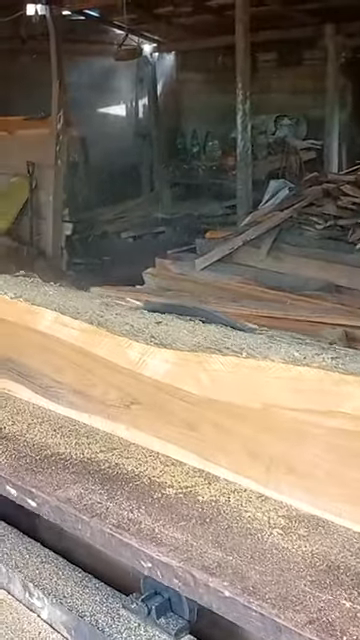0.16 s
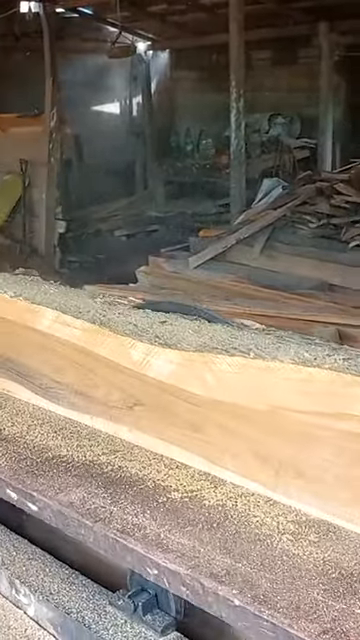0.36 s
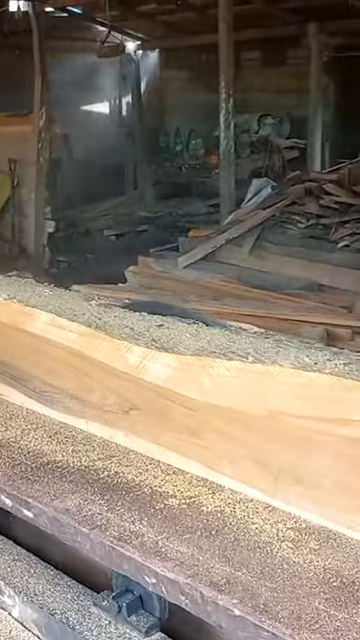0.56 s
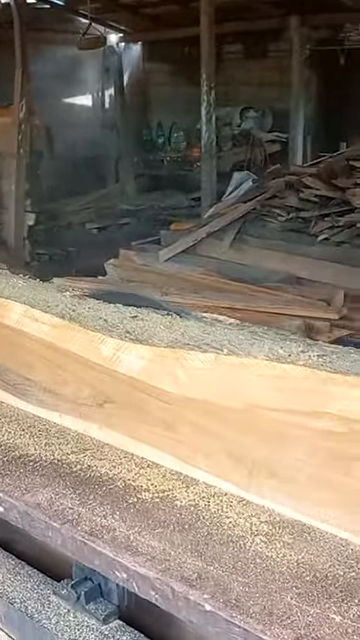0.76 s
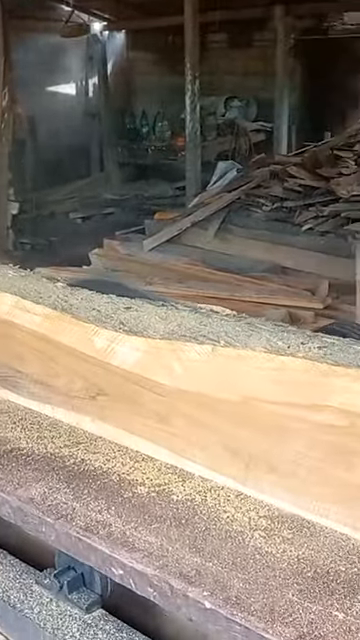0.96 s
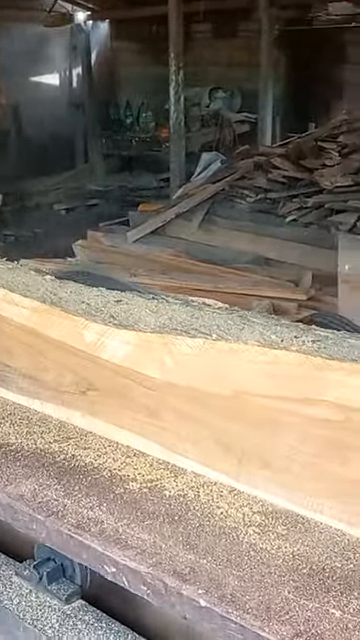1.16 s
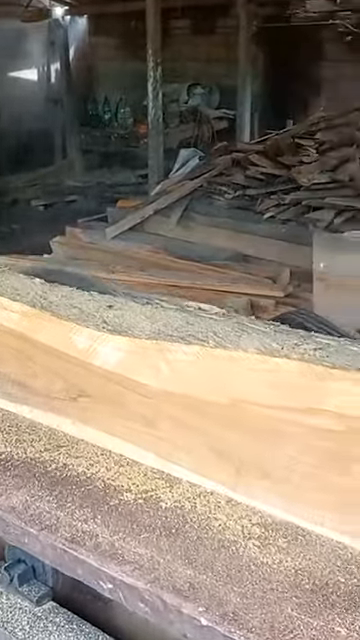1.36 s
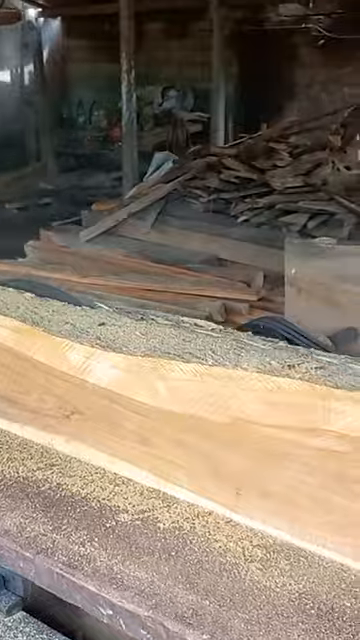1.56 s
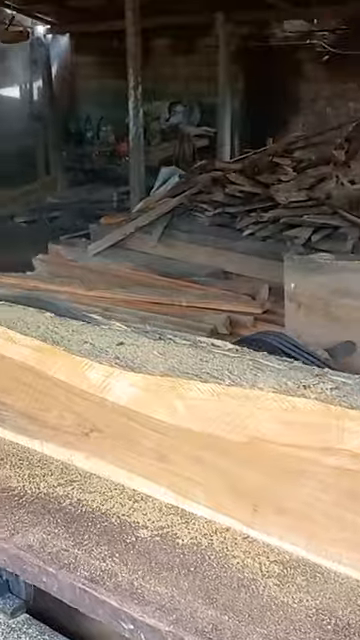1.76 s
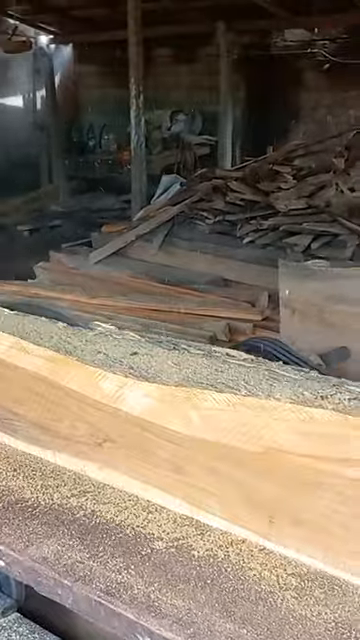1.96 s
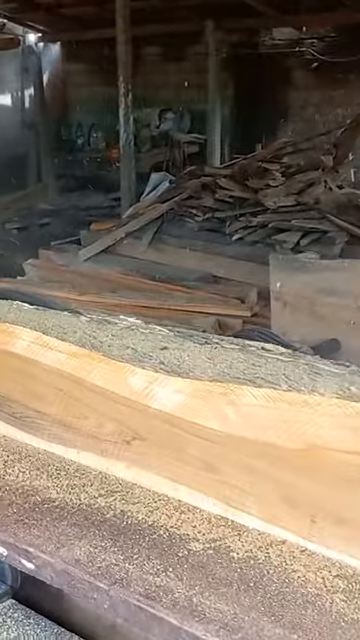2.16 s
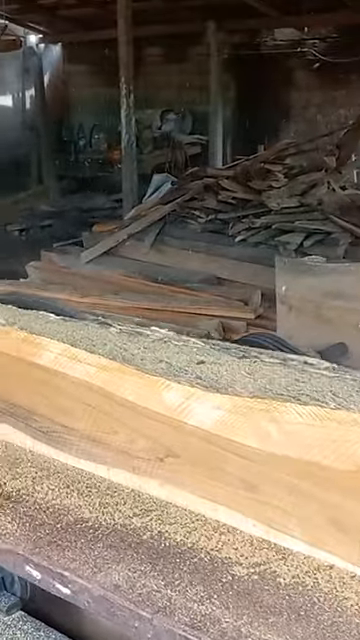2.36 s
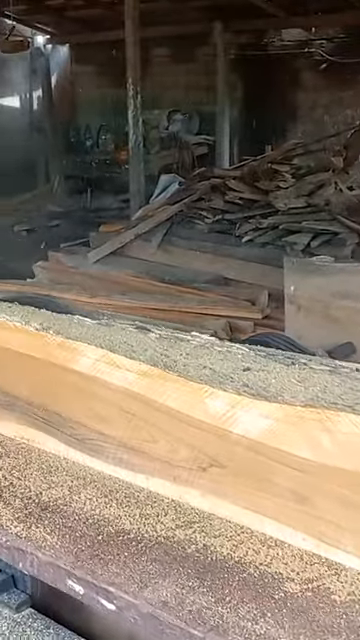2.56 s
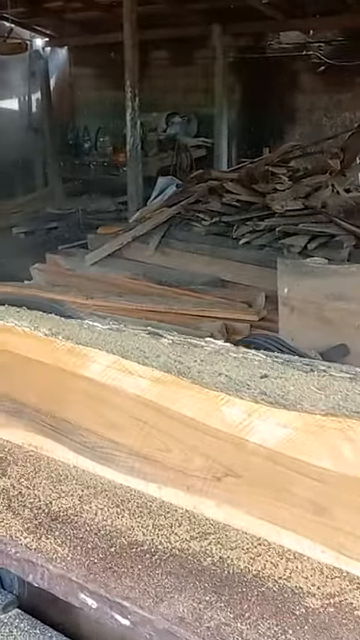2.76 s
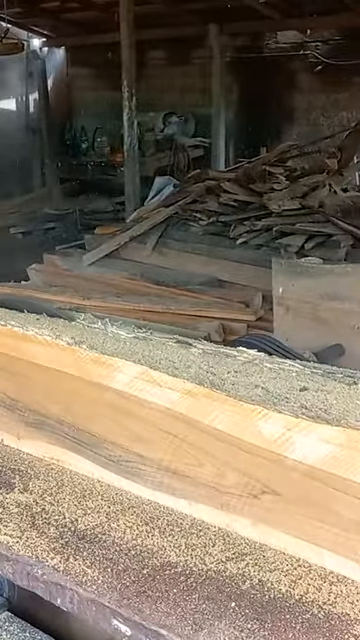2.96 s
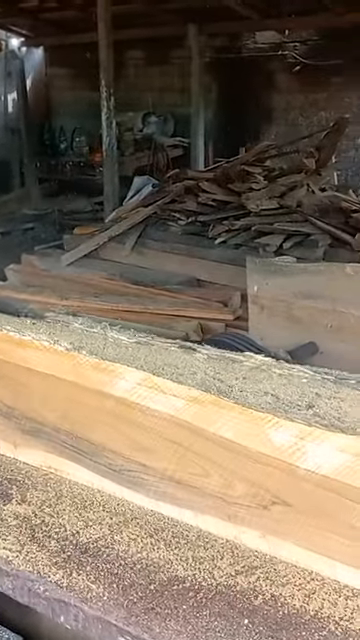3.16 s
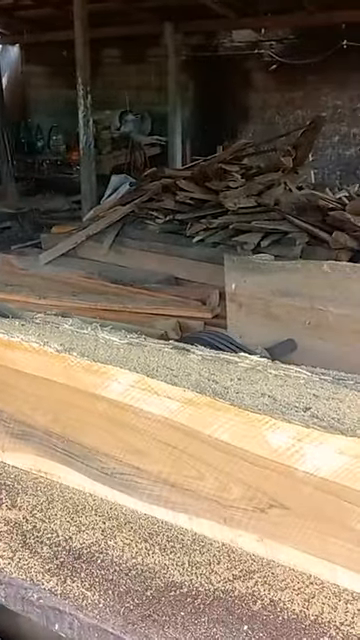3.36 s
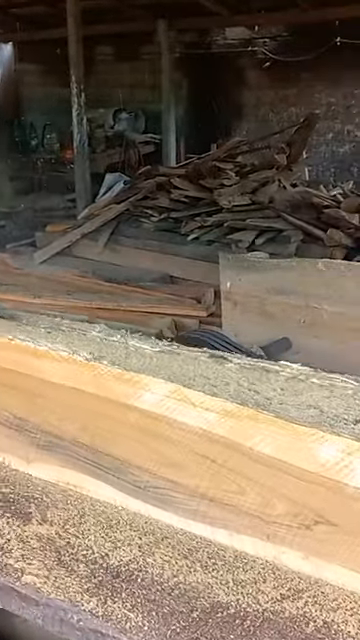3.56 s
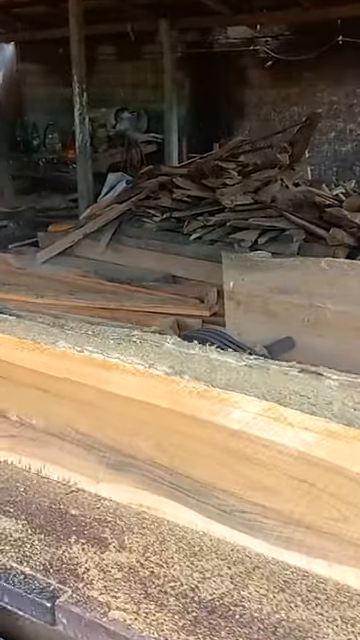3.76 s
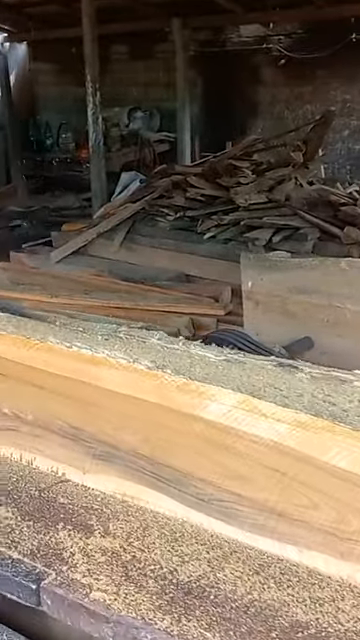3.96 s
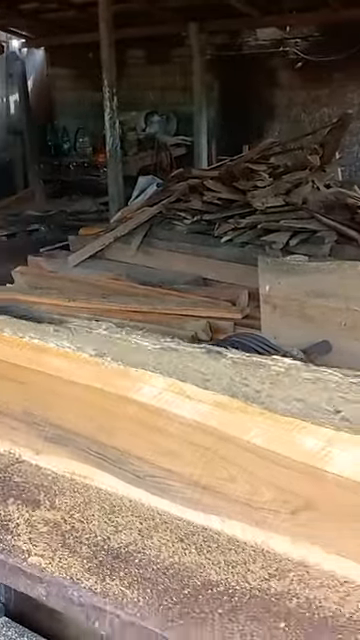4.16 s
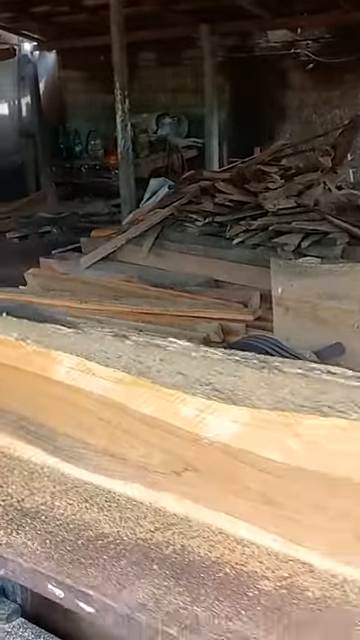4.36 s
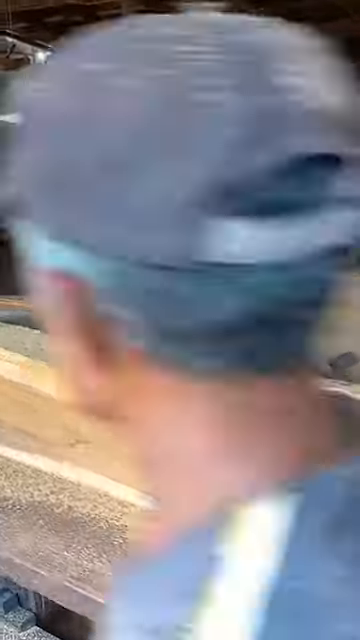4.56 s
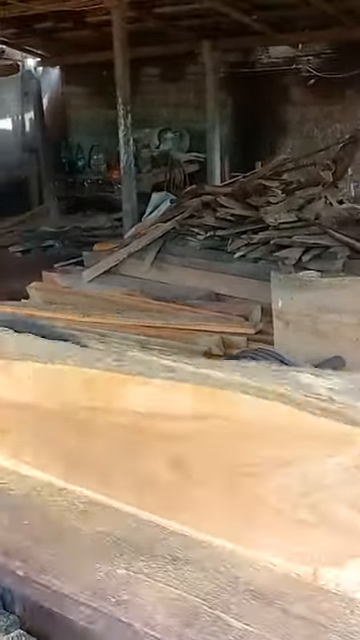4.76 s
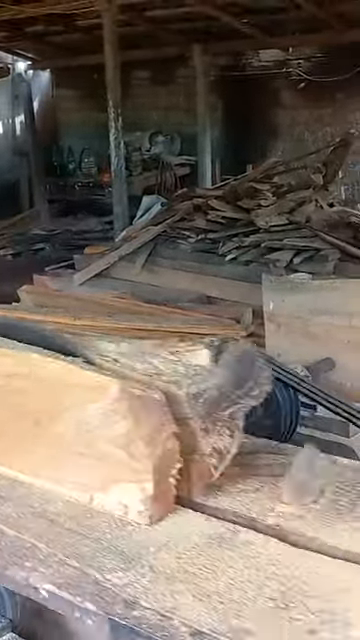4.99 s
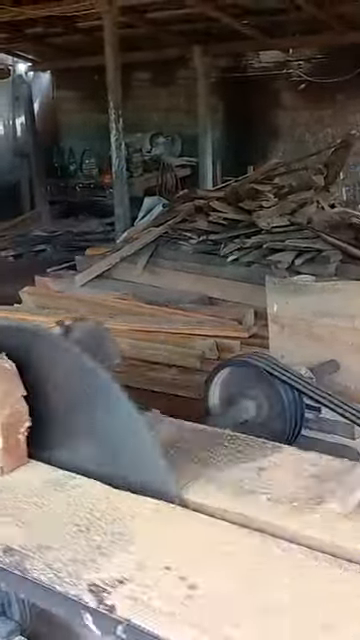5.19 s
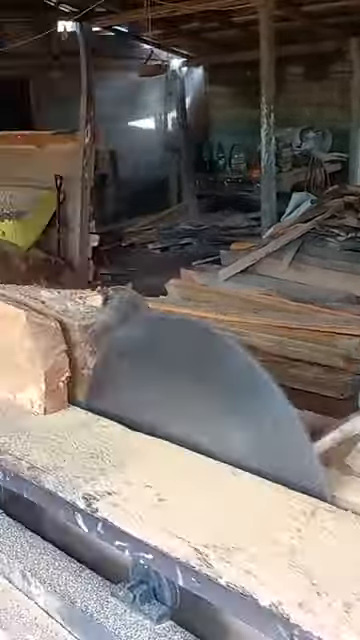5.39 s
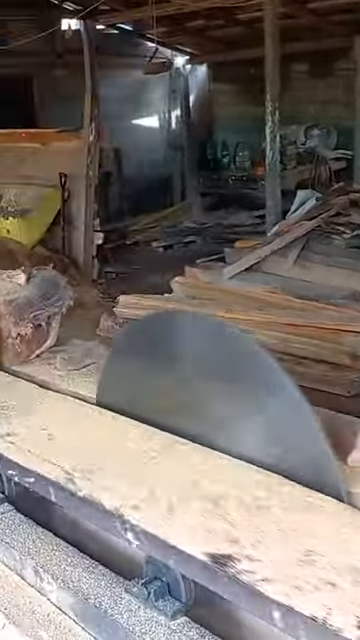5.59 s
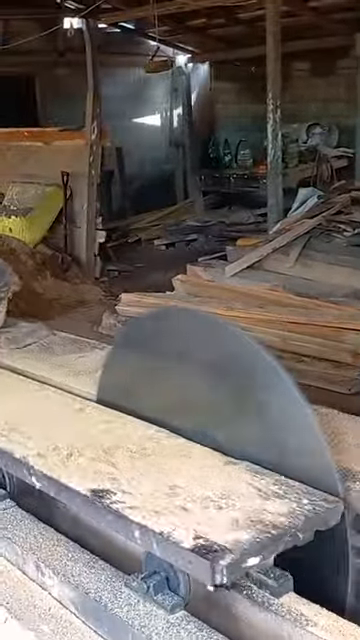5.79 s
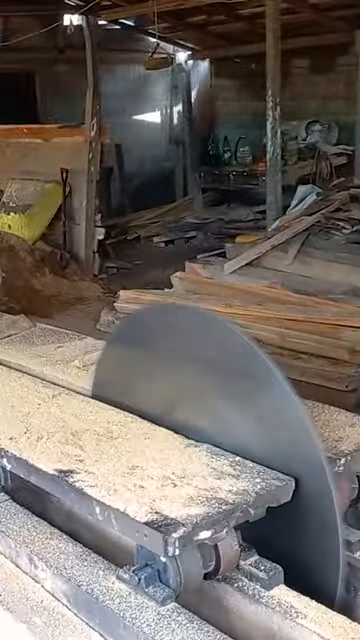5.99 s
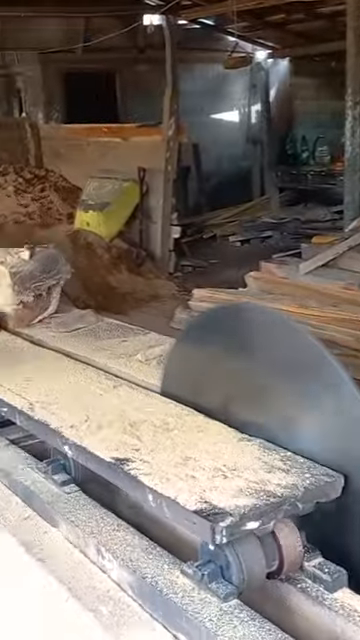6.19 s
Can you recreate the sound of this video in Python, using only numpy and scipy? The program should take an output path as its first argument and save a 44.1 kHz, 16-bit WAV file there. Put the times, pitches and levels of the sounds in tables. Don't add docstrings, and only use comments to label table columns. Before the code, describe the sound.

From the start, a large circular saw is already deep in a thick plank, loud and close in an open shed. A strident whine around 1.5 kHz, with higher overtones, is wrapped in coarse, fluttering rasp and hissing chips. About five times a second the feed hangs, easing the bite and nudging the pitch up. Dry carriage knocks tick by around 0.7-1.5 seconds. Near 3.9 seconds the tone becomes looser, more metallic and ringing, the pitch slightly higher. At about 4.9 the cut ends abruptly; the blade runs on with a thin steady whine over rumbling wheels, belt and airy hiss. Between 4.9 and 5.7 come very high, short bearing squeaks and scattered clicks. At 5.9 the carriage slams its stop in a hard, clattering double clank; the background dips, then recovers around 6.2 with a tiny squeak. The sound is thin in bass and slightly saturated.

```python
import sys
import numpy as np
from scipy import signal
from scipy.fft import rfft, irfft, next_fast_len
from scipy.io import wavfile
from scipy.ndimage import uniform_filter1d, map_coordinates

SR = 44100
rng = np.random.default_rng(int(sys.argv[2]) if len(sys.argv) > 2 else 0)


def volts_from_decibels(level):
    exponent = np.asarray(level, float) / 20
    return 10 ** exponent


def store_pcm(level_fs):
    pcm = np.round(np.clip(level_fs, -1, 1) * 32767).astype(np.int16)
    wavfile.write(sys.argv[1], SR, np.atleast_2d(pcm).T)


N = 274743
FAST = next_fast_len(N)
TIME, HZ = np.arange(N) / SR, np.fft.rfftfreq(FAST, 1 / SR) + 1
TOOTH_COUNT, FREE_TOOTH_HZ, FREE_FROM_S = 30, 1621, 4.885

# time in seconds, rate in Hz.
LOADED_RATE = [(0, 1562), (.17, 1554), (.36, 1560), (1.13, 1562), (1.27, 1536), (1.6, 1551), (1.92, 1544),
               (2.1, 1561), (2.35, 1560), (2.49, 1550), (2.66, 1533), (3.1, 1529), (3.3, 1560),
               (3.49, 1548), (3.54, 1562), (3.63, 1563), (3.73, 1601), (3.82, 1610), (4.0, 1588),
               (4.1, 1599), (4.88, 1601)]
# centre in seconds, half length in seconds,
# share of the lost speed regained from 0 to 1, easing of the bite in dB.
SLACKS = [(0.073, 0.085, 0.99, 1.5), (0.26, 0.079, 0.9, 1.5), (0.457, 0.075, 0.97, 3.5),
          (0.657, 0.12, 0.87, 4.5), (0.879, 0.085, 0.76, 2.5), (1.063, 0.07, 0.76, 1.5),
          (1.189, 0.062, 0.98, 1.5), (1.392, 0.17, 0.98, 4), (1.635, 0.088, 0.98, 3.5),
          (1.818, 0.075, 1, 1), (2.003, 0.081, 1, 1.5), (2.181, 0.095, 0.09, -1), (2.386, 0.095, 1, 2.5),
          (2.571, 0.075, 0.93, 2), (2.768, 0.13, 0.96, 3.5), (2.997, 0.081, 0.93, 1.5),
          (3.19, 0.086, 0.99, 0.5), (3.405, 0.12, 0.61, -2), (3.851, 0.053, 0.04, 2.5),
          (3.924, 0.04, 0.01, 4.5), (4.106, 0.061, 0.04, 1), (4.413, 0.1, 0.04, -0.5),
          (4.582, 0.054, 0.01, -1)]
# time in seconds, extent from 0 to 1.
SKIMMING = [(0, .5), (1.0, .5), (1.4, 1), (2.42, 1), (2.5, .15), (3.1, .2), (3.2, .6), (4.9, .6)]
# time in seconds, bite in dB, freedom of the wood to ring in dB.
CUT = [(0, -21.5, 2), (.35, -20.5, 1), (.5, -21.5, 3), (1.0, -21, 2.5), (1.75, -20, 2.5), (2.3, -22.5, 2),
       (2.65, -19.5, -1), (2.92, -20.5, 1), (3.4, -25, 4.5), (3.56, -21, -0.5), (3.75, -25.5, 6),
       (3.935, -22.5, 0), (3.965, -24, 5), (4.12, -17, 1), (4.5, -18, -4.5), (4.7, -19.5, 1.5),
       (4.86, -21, -3.5), (4.905, -43, 13)]
# time in seconds, share of the loose state from 0 to 1.
LOOSENESS = [(3.94, 0.01), (3.965, 0.75), (4.2, 1), (4.58, 0.97), (4.68, 0.8), (4.9, 1)]
# time in seconds, gain in dB.
GAIN = [(4.86, -7), (4.95, -7), (5.1, -5.5), (5.3, -3), (5.55, -3.5), (5.86, -0.5), (5.9, 1.5),
        (5.94, -8.5), (5.965, -8.5), (6.17, -8.5), (6.23, 1)]

# time in seconds, levels of the first, second and third partials in dB.
WHINE = [(.12, -36, -31.5, -25.5), (.36, -25, -28, -29), (.58, -32.5, -27, -26), (0.971, -30, -25, -28.5),
         (1.27, -31.5, -32.5, -26), (1.7, -35, -31, -22), (1.95, -53, -36, -32.5), (2.1, -46, -43, -30),
         (2.22, -41, -50, -24), (2.45, -44, -40, -24.5), (2.6, -39.5, -30.5, -38), (2.75, -43, -32.5, -31),
         (2.84, -38, -33, -32), (2.911, -32, -28.5, -33), (2.98, -41, -40, -24), (3.07, -36.5, -32, -34),
         (3.2, -37, -33, -48), (3.44, -49, -43, -44), (3.51, -39, -32.5, -32.5), (3.77, -34, -24.5, -34),
         (3.82, -45, -40, -40), (3.93, -39, -39, -45), (3.96, -40, -33, -31), (4.03, -32, -30, -31),
         (4.14, -37, -32, -43), (4.27, -45, -17, -26.5), (4.36, -41, -42, -40), (4.52, -34, -33, -35),
         (4.6, -32, -41, -52), (4.7, -37.5, -19.5, -51), (4.78, -38, -34, -51), (4.859, -41, -32, -41),
         (4.902, -35, -41, -38)]
# time in seconds, level in dB.
FOURTH_PARTIAL = [(0, -36), (2, -39), (2.66, -29), (2.8, -44), (3.45, -32), (3.6, -29), (3.9, -29.5),
                  (4, -64), (4.85, -50), (4.95, -63), (6.23, -52)]
FREE_WHINE_DB = (-27.5, -38, -40.5)
WHINE_EASE = (.6, 1.3, 1.0)
WHINE_GAP_DB = (4, 12, 12)
# waves in a turn, level against the bite in dB.
RIM_PATTERNS = [(150, -15), (158, -17), (180, -16), (189, -16), (210, -12), (222, -15), (228, -16),
                (240, -14), (250, -14), (270, -15), (278, -16), (299, -17)]
# waves in a turn, centre in seconds,
# half length in seconds, lift in dB.
RIM_SWELLS = [(150, 0.11, 0.24, 10.5), (150, 2.38, 0.11, 7), (150, 4.1, 0.054, 2), (150, 1.9, 0.064, 10),
              (150, 3.7, 0.17, 5), (158, 1.145, 0.14, 6), (158, 2.49, 0.088, 12.5), (180, 1.88, 0.093, 1),
              (180, 1.9, 0.13, 9), (180, 3.3, 0.057, 8), (180, 3.4, 0.17, 6), (189, 0.23, 0.18, 5),
              (189, 0.62, 0.18, 9), (210, 0.54, .1, 4), (210, 0.75, 0.15, 8), (210, 0.93, 0.067, 9),
              (210, 1.7, 0.065, 6), (210, 1.515, 0.1, 1), (210, 2.4, 0.26, 8.5), (210, 2.78, 0.4, 3.5),
              (222, 1.16, 0.32, 7), (222, 0.82, 0.065, 6), (228, 1.53, 0.1, 4), (228, 3.245, 0.18, 9),
              (240, 0.19, .12, 10.5), (240, 0.33, 0.092, 8.5), (240, 2.07, .3, 13.5), (240, 2.7, 0.097, 6),
              (240, 3.5, 0.17, 6), (250, 0.086, 0.23, 9.5), (250, 0.39, 0.15, 9), (250, 1.76, 0.11, 8),
              (270, 0.55, 0.27, 11), (270, 1.5, 0.082, 1), (270, 1.92, .13, 13), (270, 3.07, 0.071, 15),
              (278, 1.995, 0.22, 14), (299, .1, .15, 16.5), (299, .72, 0.3, 15), (299, 2.36, 0.23, 9)]

# frequency in Hz, density in dB per Hz.
KERF_COLOUR = [(120, -66), (200, -46), (310, -26), (366, -8.5), (735, -5.5), (1040, 4), (1560, -2),
               (2020, -6.5), (2250, 3.5), (3560, -3), (4770, -3), (7140, -8), (11300, -4), (16000, -4)]
# frequency in Hz, width in Hz, lift in dB.
GRIPPED_MODES = [(1060, 140, 7.5), (1870, 550, 12.5), (2238, 140, 5.5), (3150, 310, 3), (4450, 890, 0.5),
                 (8100, 430, 2.5), (9500, 390, 2), (11300, 430, 4), (12500, 900, 2), (15000, 1200, 2.5)]
# frequency in Hz, width in Hz, lift in dB.
GRIPPED_DEAD = [(3720, 540, -3), (5530, 210, -5), (7150, 280, -3)]
# frequency in Hz, width in Hz, lift in dB.
LOOSE_MODES = [(1092.4, 790, 4), (1840, 70, 16.5), (2150, 400, 11), (2740, 40, 12.6), (3240, 280, 7.5),
               (4710, 87, 12), (5014, 113, 13)]
# frequency in Hz, width in Hz, lift in dB.
LOOSE_HIGH = [(6877, 50, 15), (7950, 110, 13), (8340, 150, 10), (9570, 110, 17), (9800, 120, 8),
              (10090, 90, 15), (11100, 130, 18), (11700, 90, 9), (12700, 170, 8), (13300, 90, 4),
              (14200, 200, 8), (14850, 110, 7)]
# frequency in Hz, width in Hz, lift in dB.
LOOSE_DEAD = [(3850, 240, -3), (5370, 600, -8.5), (7400, 440, -5)]
# level at the start in dB, drift as the plank splits in dB a second,
# change once loose in dB, share of the freedom to ring.
BODIES = [
    (-16, -0.72, 9.5, 1),
    (-21.5, 2.5, -0.5, 0.47),
    (-17.5, 2.5, -3, 0.44),
]
EASE_SHARES = (1.3, .8, .2)
# centre in seconds, half length in seconds, lift in dB.
BOOMS = [
    (.3, 0.55, 9),
    (2.92, 0.082, 1.5),
    (3.504, 0.49, 3),
    (4.349, 0.48, 2),
]
# waves in a turn,
# gripped level in dB, loose level in dB, both against the plank.
SLAPS_LOW = [(7, -27.5, -32), (8, -28, -30.5), (11, -23, -33), (12, -22.5, -21.5), (17, -17, -31),
             (18, -25, -33), (16, -22, -45), (20, -16, -14.5), (19, -16, -20), (21, -19, -18),
             (22, -26, -12), (26, -27, -17)]
# waves in a turn, gripped level in dB, loose level in dB,
# both against the plate.
SLAPS_HIGH = [(29, -10, -24), (31, -35, -19.5), (33, -10, -29), (35, -14, -13), (36, -8, -26),
              (39, -27, -14), (41, -5, -12), (42, -5, -11), (43, -18, -20), (47, -39, -11.5),
              (51, -34, -12), (61, -5, -13), (58, -30, -15), (62, -28, -13), (92, -30, -19),
              (93.2, -32, -14)]
# waves in a turn, centre in seconds, half length in seconds, lift in dB.
SLAP_SWELLS = [(7, .1, .2, 6), (7, 2.15, .2, 10), (7, 4.44, .15, 10), (8, 3.15, .45, 12), (8, 3.68, .1, 10),
               (8, 2.78, .08, 10), (12, 4.25, .3, 5), (17, 3.8, .25, 6), (20, .4, .35, 11),
               (20, 2.2, .15, 9), (20, 2.93, .1, 14), (20, 3.4, .2, 15), (20, 3.64, .18, 13),
               (20, 4.56, .25, 11), (19, 4.35, .2, 6), (22, 4.6, .15, 10), (26, 4.35, .2, 6),
               (35, 4.2, .22, 13), (35, 4.85, .1, 6), (36, .1, .15, 8), (36, 1.45, .25, 8),
               (36, 1.75, .1, 6), (36, 3.39, .1, 9), (41, 3.4, .1, 10), (41, 4.33, .12, 8),
               (42, .68, .15, 10), (42, 2.19, .12, 9), (42, 4.12, .17, 11), (42, 4.58, .25, 13),
               (42, 4.8, .16, 15), (43, 4.72, .12, 6), (61, 4.7, .12, 12), (18, 2.2, .12, 8),
               (21, 2.3, .3, 6), (11, .55, .15, 8), (47, 4.85, .17, 16), (51, 4.04, .06, 10),
               (51, 4.2, .12, 5), (61, .97, .12, 10), (61, 1.6, .15, 8), (61, .55, .08, 8),
               (29, 4.14, .15, 8), (31, 4.17, .25, 16), (29, 1.25, .25, 6), (29, 4.75, .1, 6),
               (21, 2.94, .1, 8), (21, 3.4, .15, 7), (19, 3.6, .25, 8)]
# frequency in Hz, side against mid in dB.
WIDTH = [(60, -4), (110, -12), (200, -9), (380, -12), (700, -9.5), (1290, -18), (2380, -10), (4400, -3.5),
         (8120, 0), (15000, -0.5)]

# frequency in Hz, density in dB per Hz.
SHED_COLOUR = [(15, -76), (25, -43), (223, -26.5), (373, -9), (659, -13.5), (863, -7.5), (1480, -8.5),
               (1610, -13.5), (1740, -7.5), (2350, 2), (2690, -1.5), (5000, -6), (10100, -2), (11300, -2.5),
               (12500, -3.5), (16000, -5.5)]
# frequency in Hz, width in Hz, lift in dB.
SHED_MODES = [(360, 9.9, 6.5), (883, 4.4, 12.5), (2160, 41, -5), (4690, 850, 5)]
# start in seconds, crack level in dB, crack frequency in Hz,
# crack decay to -60 dB in seconds, thud level in dB.
KNOCKS = [(.712, -18, 4500, .012, -56), (.815, -17, 4500, .012, -54), (.912, -15, 4500, .012, -44),
          (1.011, -14, 6500, .012, -39), (1.112, -16, 7000, .012, -60), (1.114, -13, 1300, .016, -40),
          (1.219, -17, 1800, .014, -37), (1.2185, -14, 7000, .012, -60), (1.326, -13, 2200, .016, -36),
          (1.432, -11, 1050, .03, -35), (1.4298, -9, 3800, .028, -60), (1.534, -14, 1000, .016, -41),
          (1.5335, -13, 4200, .014, -60), (3.954, -13, 4500, .04, -50), (3.98, -15, 2400, .06, -60),
          (4.105, -17, 2600, .05, -60), (4.18, -18, 1000, .04, -50), (5.3318, -9, 3600, .025, -46),
          (5.225, -30, 500, .04, -38), (5.46, -26, 500, .06, -40), (5.52, -30, 500, .04, -40),
          (5.166, -25, 13500, .06, -70), (5.439, -27, 12000, .015, -70), (5.61, -25, 14000, .015, -70),
          (5.633, -24, 12500, .015, -70), (3.8158, -17, 2800, .03, -60), (4.9197, -18, 2500, .03, -60),
          (5.01, -21, 3700, .02, -60), (5.029, -20, 3700, .04, -60), (5.4655, -19, 2500, .02, -55)]
# start in seconds, crack level in dB, crack frequency in Hz,
# crack decay to -60 dB in seconds, thud level in dB.
STOP = [
    (5.87, -25, 1300, .06, -38),
    (5.8893, -2.5, 3700, .04, -25),
    (5.896, -9, 2200, .07, -34),
    (5.9, -14, 800, .12, -42),
    (5.904, -8, 2000, .07, -32),
    (5.9138, -4.5, 3000, .04, -23),
    (5.918, -4.5, 3600, .04, -42),
    (5.92, -15, 900, .1, -42),
    (5.928, -13, 3200, .04, -28),
    (5.945, -22, 600, .08, -34),
]
# start in seconds, length in seconds, high ring in dB, lower ring in dB.
SQUEAKS = [
    (4.921, 0.051, -33, -59),
    (4.985, 0.057, -29, -50),
    (5.166, .11, -27, -38),
    (5.326, 0.066, -31, -54),
    (5.418, 0.067, -22, -35),
    (5.548, 0.031, -27, -46),
    (5.608, 0.068, -27, -42),
    (5.691, .08, -48, -57),
    (6.218, 0.03, -36, -50),
]


def curves(table):
    seconds, *columns = np.transpose(table)
    return [np.interp(TIME, seconds, column) for column in columns]


def bump(time, centre_s, half_length_s):
    return np.cos(np.pi / 2 * np.clip((time - centre_s) / half_length_s, -1, 1)) ** 2


def walk(rate):
    hold = int(SR / rate)
    levels = np.repeat(rng.standard_normal(N // hold + 1), hold)
    return uniform_filter1d(levels, hold)[:N]


def spectrum(points):
    hz, db = np.transpose(points)
    return np.interp(np.log(HZ), np.log(hz), db)


def lifted(colour, modes):
    humps_db = sum(db / (1 + (2 * (HZ - hz) / width) ** 2) for hz, width, db in modes)
    return volts_from_decibels(spectrum(colour) + humps_db)


def band_shares(edges_hz, order):
    below = [1 / (1 + (HZ / hz) ** order) for hz in edges_hz]
    return np.diff([0 * HZ, *below, 1 + 0 * HZ], axis=0)


def bands(mid, side, gain, edges_hz):
    mid = rfft(mid, FAST) * gain
    side = rfft(side, FAST) * gain * volts_from_decibels(spectrum(WIDTH))
    pair = np.array([mid + side, mid - side])
    parts = [irfft(pair * np.sqrt(share), FAST)[:, :N] for share in band_shares(edges_hz, 12)]
    return [part / np.std(part.mean(axis=0)) for part in parts]


def patchy(sound, edges_hz, depth_db, rate):
    whole = rfft(sound, FAST)
    return sum(volts_from_decibels(depth_db * walk(rate)) * irfft(whole * share, FAST)[:, :N]
               for share in band_shares(edges_hz, 16))


def repeating(turns, likeness, count):
    rim = rng.standard_normal((int(turns[-1]) + 32, count))
    rim = signal.lfilter([np.sqrt(1 - likeness ** 2)], [1, -likeness], rim, axis=0)[30:]
    return map_coordinates(rim.ravel(), [turns * count], order=3)


def partial(turns, waves, db):
    apart = 0.64 * np.tanh(waves / 90) * (1 + 0.062 * walk(5.05)) * np.array([[1], [-1]])
    phase = 2 * np.pi * ((waves * turns + rng.random()) % 1) + apart
    return np.sqrt(2) * volts_from_decibels(db) * np.sin(phase.astype(np.float32))


def swell(table, waves):
    ms = TIME[::SR // 1000]
    lift_db = sum(db * bump(ms, centre, half) for row_waves, centre, half, db in table
                  if round(row_waves) == round(waves))
    return np.interp(TIME, ms, lift_db + 0 * ms)


def slack():
    centre, half, share, db = np.transpose(SLACKS)
    ms = TIME[::SR // 1000]
    shape = bump(ms, centre[:, None], half[:, None])
    regained = np.clip(share, 0, 1) @ shape
    skim = (shape ** 3).sum(axis=0) * np.interp(ms, *np.transpose(SKIMMING))
    return [np.interp(TIME, ms, curve) for curve in (regained, db @ shape, skim)]


def blade_turns(regained):
    slack_hz = 1592
    loaded_hz = curves(LOADED_RATE)[0]
    pushed_hz = loaded_hz + regained * (slack_hz - loaded_hz)
    tooth_hz = np.where(TIME < LOADED_RATE[-1][0], pushed_hz, FREE_TOOTH_HZ)
    return np.cumsum(uniform_filter1d(tooth_hz, size=600)) / SR / TOOTH_COUNT


def tooth_whine(turns, ease_db, skim):
    cutting = np.clip((FREE_FROM_S - TIME) / 0.057, .2, 1)
    uneven_db = 2.6 * repeating(turns, 0.8, count=10)
    wander_turns = 0.00045 * repeating(turns, 0.31, count=30)
    gain_db = curves(GAIN)[0]
    levels_db = []
    for db, share, gap_db, free_db in zip(curves(WHINE), WHINE_EASE, WHINE_GAP_DB, FREE_WHINE_DB):
        loaded_db = db - share * ease_db - gap_db * skim
        levels_db.append(np.where(TIME < FREE_FROM_S, loaded_db, free_db + gain_db))
    levels_db.append(curves(FOURTH_PARTIAL)[0] - 14 * skim + 3 * walk(12) - 5)
    out = 0
    for harmonic, db in enumerate(levels_db, 1):
        shaken_db = cutting * (uneven_db + 1.5 * walk(30.02))
        out = out + partial(turns + cutting * wander_turns, harmonic * TOOTH_COUNT, db + shaken_db)
    return out


def rim_singing(turns, bite_db):
    eased_db = bite_db - 7 * curves(LOOSENESS)[0]
    out = 0
    for waves, db in RIM_PATTERNS:
        grain_db = 2.0 * np.tanh(walk(5.54))
        level_db = db + eased_db + swell(RIM_SWELLS, waves) + grain_db
        proud_teeth = 0.4 + repeating(turns, 0.12, count=6)
        out = out + proud_teeth * partial(turns, round(waves), level_db)
    return out


def kerf_rasp(turns, bite_db, plate_db, plank_db, chips_db):
    uneven = 0.26 * repeating(turns, 0.94, count=8) + 0.15 * repeating(turns, 0.71, count=30)
    uneven = uneven + 0.41 * np.cos(2 * np.pi * turns)
    tooth_pulse = 1 + 0.83 * np.cos(2 * np.pi * TOOTH_COUNT * turns)
    bite = volts_from_decibels(6.24 * np.tanh(uneven)) * tooth_pulse
    mid, side = (bite * repeating(turns, 0.74, count=760) for _ in range(2))
    mid = mid + .6 * repeating(turns, .93, count=64)
    loose = np.clip(curves(LOOSENESS)[0], 0, 1)
    states = ((GRIPPED_MODES + GRIPPED_DEAD, 1 - loose), (LOOSE_MODES + LOOSE_HIGH + LOOSE_DEAD, loose))
    trims_db = (plank_db - 7.0, plate_db + 0.5, chips_db + 2.5, -1.6)
    out = 0
    for modes, share in states:
        parts = bands(mid, side, lifted(KERF_COLOUR, modes), (1500, 2950, 6200))
        out = out + share * sum(volts_from_decibels(bite_db + db + 1.0 * walk(26.2)) * part
                                for part, db in zip(parts, trims_db))
    return patchy(out, (5600, 7200, 8800, 10400, 11500, 12800, 14300), depth_db=1.3, rate=6)


def slot_slaps(turns, bite_db, plate_db, plank_db):
    loose = np.clip(curves(LOOSENESS)[0], 0, 1)
    out = 0
    for slaps, body_db in ((SLAPS_LOW, plank_db), (SLAPS_HIGH, plate_db)):
        for waves, gripped_db, loose_db in slaps:
            state_db = gripped_db + loose * (loose_db - gripped_db)
            level_db = bite_db + body_db + state_db + swell(SLAP_SWELLS, waves) + 1.5 * walk(9)
            out = out + partial(turns, round(waves), level_db)
    return out


def shed():
    grains = (rng.standard_normal(N) * volts_from_decibels(1.72 * walk(300) + 0.9 * walk(30)) for _ in range(2))
    parts = bands(*grains, lifted(SHED_COLOUR, SHED_MODES), (480, 1500, 5700))
    rolls_from_s = 5.13
    standing = np.clip((rolls_from_s - TIME) / 0.069, 0, 1)
    levels_db = (-38.5 - 3.5 * standing, -30 - 2 * standing, -25, -31.5)
    pressed_db = -4 * np.clip((GAIN[0][0] - TIME) / .08, 0, 1)
    gain_db = curves(GAIN)[0] + pressed_db
    return sum(volts_from_decibels(gain_db + db) * part for part, db in zip(parts, levels_db))


def strike(crack_db, crack_hz, t60, thud_db, hollow_hz):
    t = np.arange(8000) / SR
    noise = rng.standard_normal((2, len(t)))
    pair = noise[0] + 0.36 * noise[1] * np.array([[1], [-1]])
    ring = signal.butter(2, [.55 * crack_hz, 1.3 * crack_hz], "band", fs=SR, output="sos")
    pair = signal.sosfilt(ring, pair)
    ringing = pair / np.std(pair) / 1.7 * np.exp(-np.log(1000) * t / t60)
    tick = .1 * uniform_filter1d(noise[0] + .6 * noise, size=3) * np.exp(-t / .0012)
    thud_shape = (t / .009) ** 2 * np.exp(2 - 2 * t / .009)
    thud = volts_from_decibels(thud_db - 2) * np.sin(2 * np.pi * hollow_hz * t) * thud_shape
    return volts_from_decibels(crack_db) * (ringing + tick) + thud


def knocks(events, hollow_hz):
    out = np.zeros((2, N + 8000))
    for start_s, *blow in events:
        start = int(start_s * SR)
        out[:, start:start + 8000] += strike(*blow, hollow_hz)
    return out[:, :N]


def squeak():
    starts, lengths, *levels_db = np.transpose(SQUEAKS)
    edge_s, fade = .008, .6
    on = np.array([np.interp(TIME, [s - edge_s, s, s + length, s + length + 2 * edge_s], [0, 1, fade, 0]) ** 2
                   for s, length in zip(starts, lengths)])
    out = 0
    for hz, width, db in zip((15560, 11040), (160, 70), levels_db):
        resonance = 1 / (1 + (2 * (HZ - hz) / width) ** 2) ** 0.75
        ring = irfft(rfft(rng.standard_normal((2, FAST))) * resonance, FAST)[:, :N]
        flutter = volts_from_decibels(2 + 4 * walk(70))
        out = out + volts_from_decibels(db) @ on * flutter * ring / np.std(ring)
    return out


def scene():
    regained, ease_db, skim = slack()
    turns = blade_turns(regained)
    bite_db, ring_db = curves(CUT)
    loose = curves(LOOSENESS)[0]
    plate_db, plank_db, chips_db = [
        start + drift * TIME + freed * loose + share * ring_db + kept * ease_db
        for (start, drift, freed, share), kept in zip(BODIES, EASE_SHARES)]
    plank_db = plank_db + sum(db * np.clip(1 - np.abs(TIME - s) / half, 0, 1) for s, half, db in BOOMS)
    bite_db = bite_db - ease_db - 300 * np.clip(TIME - CUT[-1][0], 0, 1)
    blade = tooth_whine(turns, ease_db, skim) + rim_singing(turns, bite_db)
    cut = kerf_rasp(turns, bite_db, plate_db, plank_db, chips_db)
    cut = cut + slot_slaps(turns, bite_db, plate_db, plank_db)
    carriage = knocks(KNOCKS, hollow_hz=285) + squeak() + knocks(STOP, hollow_hz=380)
    return blade + cut + shed() + carriage


def roll_off(x):
    return signal.sosfilt(signal.butter(12, 16460, fs=SR, output="sos"), x)


def record(dry):
    thin = signal.sosfilt(signal.butter(4, 240, "high", fs=SR, output="sos"), dry)
    rounded = np.tanh(0.68 * thin) / 0.7
    noise = rng.standard_normal((2, N))
    pair = noise[0] + 0.3 * noise[1] * np.array([[1], [-1]])
    hum = signal.sosfilt(signal.butter(1, [60, 300], "band", fs=SR, output="sos"), pair)
    hum_db = -68.5
    top = signal.ellip(12, .3, 85, 15720, fs=SR, output="sos")
    mix = signal.sosfilt(top, rounded + volts_from_decibels(hum_db) * hum / np.std(hum))
    return roll_off(mix)


dry = scene()
out = record(dry)
store_pcm(out)
```